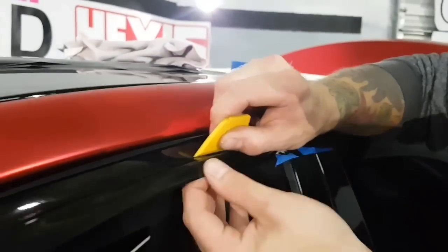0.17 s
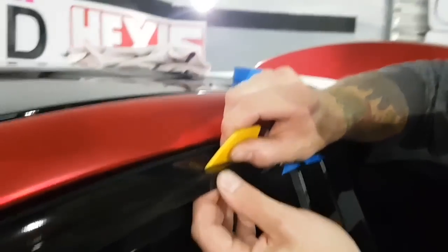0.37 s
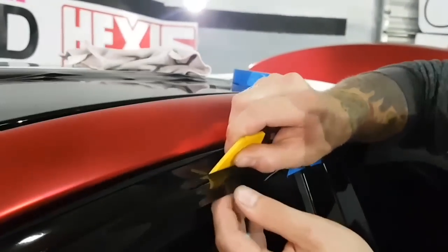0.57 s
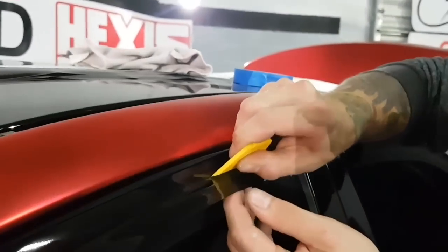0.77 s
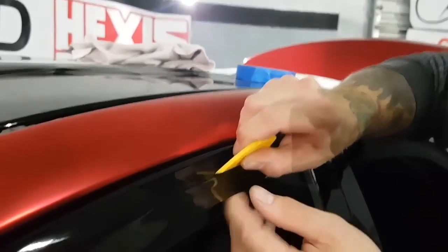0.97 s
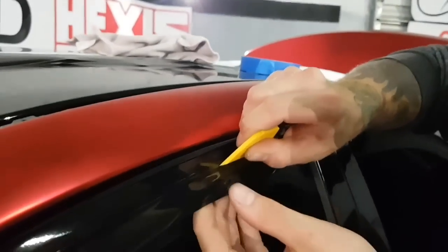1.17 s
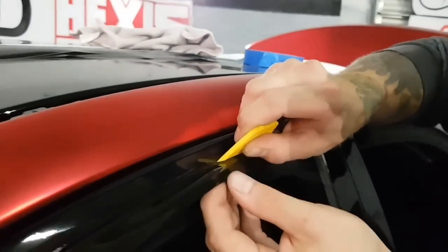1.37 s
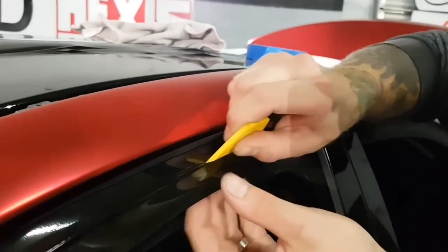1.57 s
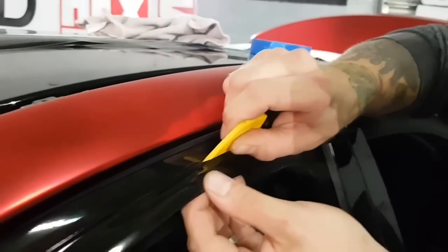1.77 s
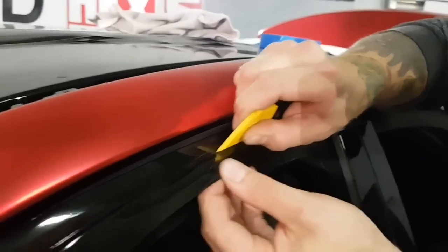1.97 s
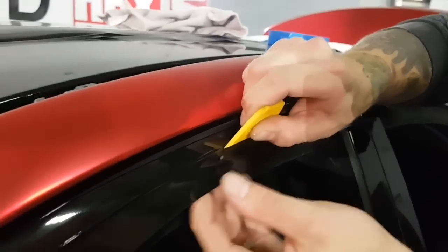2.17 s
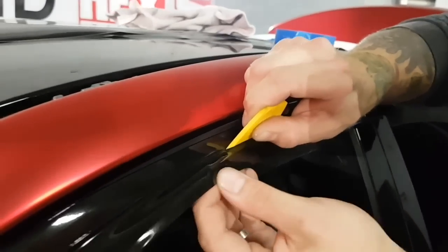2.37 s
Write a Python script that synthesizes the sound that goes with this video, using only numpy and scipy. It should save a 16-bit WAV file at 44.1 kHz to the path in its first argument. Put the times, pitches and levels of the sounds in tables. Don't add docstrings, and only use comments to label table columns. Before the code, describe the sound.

Sharp plastic clicks on a car's trim edge, thin film creaking and rubbing, faint machine hum

```python
import sys
import numpy as np
from scipy import signal
from scipy.fft import rfft, irfft, next_fast_len
from scipy.io import wavfile

SR = 44100
rng = np.random.default_rng(int(sys.argv[2]) if len(sys.argv) > 2 else 0)


def dump_mix(stems):
    frames = np.atleast_2d(stems).T
    limited = np.clip(frames, -1, 1)
    pcm = np.round(limited * 32767).astype(np.int16)
    wavfile.write(sys.argv[1], SR, pcm)


def magnitude_from_level(level_db):
    exponent = np.asarray(level_db, float) / 20
    return 10 ** exponent


N = 107030


def unit(x):
    return x / np.sqrt(np.mean(x ** 2) + 1e-20)


def along(points, hz):
    f, v = np.transpose(points)
    return np.interp(np.log(hz + 1), np.log(f + 1), v)


def over_time(points):
    s, db = np.transpose(points)
    return np.interp(np.arange(N) / SR, s, db)


def filtered(x, response):
    m = next_fast_len(N + SR // 2)
    return irfft(rfft(x, m) * response(np.fft.rfftfreq(m, 1 / SR)), m)[..., :N]


def causal(points, size=1024):
    cepstrum = irfft(np.log(magnitude_from_level(along(points, np.fft.rfftfreq(size, 1 / SR)))), size)
    cepstrum[1:size // 2] *= 2
    cepstrum[size // 2 + 1:] = 0
    return irfft(np.exp(rfft(cepstrum)), size)


def peak(f, hz, width_hz):
    return 1j * f * width_hz / (hz * hz - f * f + 1j * f * width_hz)


def laid(s, shapes):
    at = np.round(s * SR).astype(int)[:, None] + np.arange(shapes.shape[1])
    return np.bincount(at.ravel(), shapes.ravel(), N + SR)[:N]


# (frequency [Hz], correlation)
PORT_LIKENESS = [(60, .98), (200, .95), (350, .85), (640, .5), (1400, 0)]


def paired(pair):
    turn = lambda hz: np.arccos(along(PORT_LIKENESS, hz)) / 2
    mid, side = filtered(pair, lambda hz: np.array([np.cos(turn(hz)), np.sin(turn(hz))]))
    return np.array([mid + side, mid - side])


# (frequency [Hz], left over right [dB])
AIR_BALANCE = [(60, -1), (400, -0.5), (1300, -5.5), (4400, -9), (8000, 3)]


def room_air(gain):
    def tilt(hz):
        return gain(hz) * magnitude_from_level(np.outer([.5, -.5], along(AIR_BALANCE, hz)))
    return unit(filtered(paired(rng.standard_normal((2, N))), tilt))


# (frequency [Hz], density [dB per Hz])
AIR_COLOUR = [(20, 1), (50, -4), (80, 1), (300, -15.5), (700, -18), (2000, -26), (5000, -35), (14000, -40)]
AIR_DB = -57.5


def air():
    return magnitude_from_level(AIR_DB) * room_air(lambda f: magnitude_from_level(along(AIR_COLOUR, f)))


# (frequency [Hz], width [Hz], level [dB])
MACHINE_BANDS = [(70, 27, -58), (103.4, 13.6, -63.5), (149.5, 47, -61), (237.4, 62, -68), (379, 50, -72)]
# (time [s], load [dB])
MACHINE_LOAD = [
    (0, -51.5),
    (.3, -51.5),
    (.6, -60.5),
    (1.05, -59.5),
    (1.3, -54.5),
    (1.75, -56.5),
    (2.1, -60),
    (2.3, -55),
]


def machines():
    hum = 0
    for hz, width_hz, db in MACHINE_BANDS:
        hum = hum + magnitude_from_level(db) * room_air(lambda f: np.abs(peak(f, hz, width_hz)) ** 2)
    mean_load_db = np.transpose(MACHINE_LOAD)[1].mean()
    return hum * magnitude_from_level(over_time(MACHINE_LOAD) - mean_load_db)


# (frequency [Hz], T60 [s])
HALL_T60 = [(200, 1.08), (2000, 1.3), (6000, 0.73), (14000, 0.56)]
# (frequency [Hz], level [dB])
REFLECTION_COLOUR = [(150, -6), (400, 7), (900, 5.5), (2200, 3.5), (3600, -3), (6000, 2.5), (12000, 1)]
HALL_DB, BODY_DB, BODY_T60_S = -14.5, -4, 0.028


def shop(x):
    hz, t, (far, near) = signal.stft(rng.standard_normal((2, 2, SR)), SR, nperseg=256)
    hz = hz[:, None]
    colour = magnitude_from_level(along(REFLECTION_COLOUR, hz))
    hall_fall = magnitude_from_level(-60 * t / along(HALL_T60, hz))
    body_fall = magnitude_from_level(-60 * t / BODY_T60_S)
    hall = signal.istft(far * hall_fall * colour, SR, nperseg=256)[1]
    body = signal.istft(near * body_fall * colour, SR, nperseg=256)[1]
    late = np.pad(hall, ((0, 0), (500, 0)))[:, :SR]
    tail = magnitude_from_level(HALL_DB) * late / np.linalg.norm(hall[0])
    tail = tail + magnitude_from_level(BODY_DB) * body[:, :SR] / np.linalg.norm(body[0])
    return paired(signal.fftconvolve(x[None], tail, axes=1)[:, :N])


# (time [s], level [dB])
RUB_PRESSURE = [(0, -50.5), (0.072, -43), (.16, -46), (.34, -60.5), (.55, -99.5), (1.04, -88),
                (1.119, -49.5), (1.2, -60), (1.46, -65), (1.532, -53), (1.58, -69.5), (1.721, -55.5),
                (2, -70.5), (2.15, -80), (2.203, -45.5), (2.3, -63), (2.379, -50.5), (2.43, -58.5)]
# (frequency [Hz], density [dB per Hz])
SKIN_COLOUR = [(300, -8.5), (1500, 2), (3000, 6), (6000, -9.5), (14000, -22)]
GRAIN_DB, HISS_DB = -6, -5
GRAIN_HZ, GRAIN_RANGE_DB = 6040, 14
GRAINS_PER_S, GRAIN_SPREAD_DB = 1500, 3.5


def rubbing():
    count = int(GRAINS_PER_S * N / SR)
    place, size, pitch = rng.random((count, 3)).T[..., None]
    s, t = place * N / SR, np.arange(160) / SR
    hz = GRAIN_HZ * magnitude_from_level(GRAIN_RANGE_DB * (pitch - .5))
    at, db = np.transpose(RUB_PRESSURE)
    level = GRAIN_DB + np.interp(s, at, db) - GRAIN_SPREAD_DB * np.log(1 - .99 * size)
    fall = magnitude_from_level(level - 60 * t * hz / 4)
    grains = laid(s[:, 0], fall * np.sin(2 * np.pi * hz * t) * np.tanh(t * hz))
    hiss = unit(filtered(rng.standard_normal(N), lambda f: magnitude_from_level(along(SKIN_COLOUR, f))))
    return grains + magnitude_from_level(HISS_DB + over_time(RUB_PRESSURE)) * hiss


# (frequency [Hz], level [dB])
PORT_RING_MODES = [(1851, 2.5), (1508, -5), (2124, -1.5)]
# (frequency [Hz], width [Hz], level [dB])
PANEL_MODES = [(245, 79, 6.5), (348, 47, 4), (538, 183, 8.5), (904, 404, 7.5)]
# (frequency [Hz], level [dB])
EDGE_COLOUR = [(300, -29), (1500, 8), (5000, 5), (7500, -3.5), (9500, -1.5), (12000, -3.5), (14500, -7.5),
               (14900, -5.5)]
BLADE_MODES = [(1.021, 1), (1.33, 0.47), (0.73, 0.4), (1.7, 0.12)]
BLADE_DB, RING_DB, EDGE_DB, PANEL_DB, SCRAPE_DB = 9, 11.5, 19.5, 20, -22
ONSET_DELAY_S, BLADE_RISE_S, RING_RISE_S = .0005, .0004, .00081
RING_T60_S, RING_SCATTER = 0.0066, .02
CRACK_RISE = 0.13
SCRAPE_T60_S, SCRAPE_RISE_S = 0.022, 0.0025
LEAD_IN_T60_S, LEAD_IN_DB = .015, -19
RING_LEFT_DB, RING_LEADS_S = -15, .00004
APART_HZ = 6000
SOFT_HZ = 1520


def clicks(rows, blade_t60, edge_t60, scraping):
    s, blade_db, hz, ring_db, edge_db = np.transpose(rows)[..., None]
    s, t = s[:, 0] + ONSET_DELAY_S, np.arange(900) / SR
    noise = rng.standard_normal((4, len(rows), len(t)))
    luck = rng.standard_normal((len(rows), 6))

    def die(t60, rise):
        return magnitude_from_level(-60 * t / t60) * (1 - np.exp(-t / rise))

    blade = 0
    for j, (ratio, gain) in enumerate(BLADE_MODES):
        blade = blade + gain * np.sin(2 * np.pi * hz * ratio * t + 2 * luck[:, [j]])
    blade = laid(s, magnitude_from_level(BLADE_DB + blade_db) * blade * die(blade_t60, BLADE_RISE_S))

    trim = 0
    for j, (f, db) in enumerate(PORT_RING_MODES):
        trim = trim + magnitude_from_level(db) * np.sin(2 * np.pi * f * (1 + RING_SCATTER * luck[:, [j + 3]]) * t)
    ring = magnitude_from_level(RING_DB + ring_db) * trim * die(RING_T60_S, RING_RISE_S)

    edge_gain = magnitude_from_level(EDGE_DB + edge_db)
    snap = die(edge_t60, CRACK_RISE * edge_t60)
    scrape = scraping * magnitude_from_level(SCRAPE_DB) * noise[1] * die(SCRAPE_T60_S, SCRAPE_RISE_S)
    lead_in = scraping * magnitude_from_level(LEAD_IN_DB - 60 * t[::-1] / LEAD_IN_T60_S) * noise[2]
    edge = laid(s, edge_gain * (noise[0] * snap + scrape)) + laid(s - t[-1], edge_gain * lead_in)
    own = laid(s, edge_gain * (noise[3] - noise[0]) * snap)
    edge = edge + [[1], [0]] * filtered(own, lambda f: f > APART_HZ)
    edge = signal.fftconvolve(edge, causal(EDGE_COLOUR)[None], axes=1)[:, :N]

    def thud(f):
        modes = sum(magnitude_from_level(db) * peak(f, centre, width) for centre, width, db in PANEL_MODES)
        return modes / (1 + 1j * f / SOFT_HZ) ** 2

    panel = filtered(laid(s, magnitude_from_level(PANEL_DB + (ring_db + blade_db) / 2)), thud)
    rings = [magnitude_from_level(RING_LEFT_DB) * laid(s - RING_LEADS_S, ring), laid(s, ring)]
    return blade + edge + panel + rings


# (time [s], peak [dB], edge crack [dB])
FILM_TICKS = [(0.6053, -55, -72), (0.618, -60, -55), (0.7542, -49.5, -56), (0.9318, -52, -87),
              (0.951, -63, -77), (0.9604, -62, -61.5), (0.9718, -54.5, -60), (0.9943, -51, -62),
              (0.999, -72, -73), (1.0047, -56, -81), (1.054, -54, -63), (1.2262, -59, -54.5),
              (1.2398, -62, -74), (1.266, -46, -75), (1.2782, -42.5, -56), (1.2929, -47, -52.5),
              (1.3243, -49, -58.5), (1.332, -59, -61.5), (1.3459, -52, -63), (1.3657, -49.5, -50),
              (1.3806, -53, -51), (1.3972, -63, -62), (1.401, -64, -56), (1.4435, -50, -66),
              (1.4527, -42.5, -59), (1.6696, -53, -58), (2.1, -62, -57)]
TICK_HZ, TICK_SCATTER_DB, TICK_RING_DB = 4100, .4, -15
CREAK_S, CREAK_GAP_S = .852, .0059
CREAK_DB, CREAK_EDGE_DB = -56, -64
DRAG_S, DRAG_END_S = 1.39, 1.565
DRAG_DB, DRAG_EDGE_DB = -55.5, -66.5


def film():
    slips = list(FILM_TICKS)
    for k in range(9):
        slips.append((CREAK_S + k * CREAK_GAP_S, CREAK_DB + rng.normal(0, 1.2), CREAK_EDGE_DB))
    for g in rng.normal(0, 1.3, size=90):
        slips.append((rng.uniform(DRAG_S, DRAG_END_S), DRAG_DB + g, DRAG_EDGE_DB + g))
    rows = []
    for s, db, edge_db in slips:
        hz = TICK_HZ * magnitude_from_level(rng.normal(0, TICK_SCATTER_DB))
        rows.append((s, db, hz, db + TICK_RING_DB, edge_db))
    return clicks(rows, blade_t60=.0025, edge_t60=.0015, scraping=0.32)


# (time [s], blade [dB], blade pitch [Hz], port ring [dB], edge crack [dB])
FIRST_SNAPS = [(0.0412, -53, 2920, -59, -74), (0.0504, -36, 3330, -89, -72),
               (0.0656, -49, 2950, -38, -47.5), (0.0703, -61, 3000, -37, -50),
               (0.0775, -24, 3150, -24.5, -33), (0.0903, -13.5, 3490, -34.5, -33.5),
               (0.0985, -39, 2870, -34, -62), (0.1052, -26.5, 3000, -31.5, -44.5),
               (0.1145, -37, 2850, -32, -64), (0.122, -53, 3040, -40, -64), (0.1405, -29.5, 2800, -41, -49),
               (0.3314, -76, 3560, -47.5, -45.5), (0.3363, -25.5, 3030, -61.5, -43),
               (0.3434, -70, 3720, -43, -42), (0.6945, -49.5, 2870, -56.5, -69),
               (0.7193, -44, 3680, -65, -50.5), (1.077, -44, 3550, -94, -69), (1.0889, -41, 3570, -77, -65),
               (1.0939, -43, 3240, -70, -59), (1.1056, -61, 3330, -46, -58),
               (1.1117, -19, 3400, -37, -39.5), (1.1293, -53, 4140, -69, -72),
               (1.1338, -37, 3460, -66, -57), (1.1385, -44, 3270, -58, -58), (1.1435, -45, 2820, -62, -53),
               (1.1549, -29, 3770, -52.5, -42)]
# (time [s], blade [dB], blade pitch [Hz], port ring [dB], edge crack [dB])
LATER_SNAPS = [(1.5231, -43, 3320, -47, -51), (1.6368, -44, 3090, -45, -57), (1.714, -32, 3030, -41, -45),
               (1.7221, -43, 2800, -46, -62), (1.7855, -71, 3000, -52, -78), (1.8004, -46, 3250, -49, -59),
               (1.8069, -57, 3000, -51, -77), (1.816, -46, 3000, -49.5, -73), (1.9034, -70, 2980, -53, -84),
               (1.9134, -51, 3170, -47, -83), (1.9229, -52, 3130, -48, -74),
               (2.0394, -43.5, 2900, -47, -55), (2.0492, -37.5, 4690, -44, -48.5),
               (2.061, -57, 4500, -67, -59), (2.068, -53, 3170, -39.5, -59), (2.072, -55, 4200, -52, -56),
               (2.0772, -60, 4140, -70, -63), (2.0871, -43.5, 3130, -42, -62),
               (2.164, -43.5, 3340, -84, -66), (2.1774, -71, 3100, -47, -57), (2.184, -56, 3030, -51, -61),
               (2.1919, -40, 3230, -79, -54.5), (2.1968, -39, 3150, -65, -55),
               (2.2009, -36, 3100, -70, -46), (2.2062, -21, 3460, -68, -54),
               (2.2075, -29.5, 3130, -24.5, -39), (2.216, -58, 4000, -61, -53),
               (2.2426, -48, 2630, -60, -54), (2.246, -41, 2670, -55, -53), (2.2505, -41, 2670, -50, -53.5),
               (2.27, -33, 3340, -34.5, -40), (2.3968, -54, 2950, -45, -54)]


def tool():
    return clicks(list(FIRST_SNAPS) + list(LATER_SNAPS), blade_t60=0.0042, edge_t60=0.0025, scraping=0.37)


# (frequency [Hz], left over right [dB])
WORK_BALANCE = [(300, 1.5), (700, -1), (1500, -12), (2600, -3.5), (3500, -9), (5200, -10), (7500, 6.5),
                (12000, -3.5)]
LEFT_LEADS_S = .000095


def scene():
    work = rubbing() + film() + tool()
    left = np.convolve(work[0], causal([(hz, db / 2) for hz, db in WORK_BALANCE]))[:N]
    right = np.convolve(work[1], causal([(hz, -db / 2) for hz, db in WORK_BALANCE]))[:N]
    right = filtered(right, lambda f: np.exp(-2j * np.pi * f * LEFT_LEADS_S))
    return air() + machines() + shop(work[1]) + np.array([left, right])


def roll_off(x):
    return signal.sosfilt(signal.butter(12, 16520, fs=SR, output="sos"), x)


# (frequency [Hz], level [dB])
MIC_COLOUR = [(7000, 2.5), (9300, -2), (10600, 1.5), (12500, 4), (14450, 3.5), (14750, -10), (16500, -7)]
BASS_CUT_HZ = 45


def record(dry):
    def microphone(f):
        return magnitude_from_level(along(MIC_COLOUR, f)) * f ** 2 / (f ** 2 + BASS_CUT_HZ ** 2)
    heard = filtered(dry, microphone)
    return roll_off(heard)


dry = scene()
out = record(dry)
dump_mix(out)
```